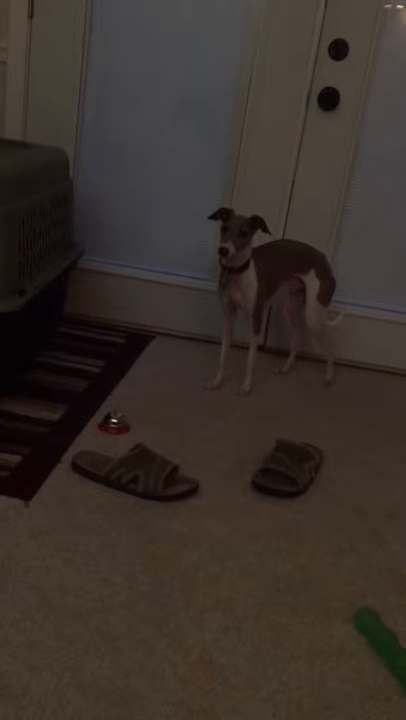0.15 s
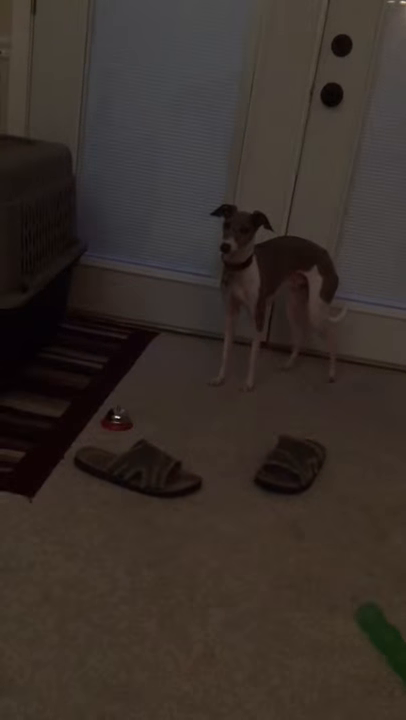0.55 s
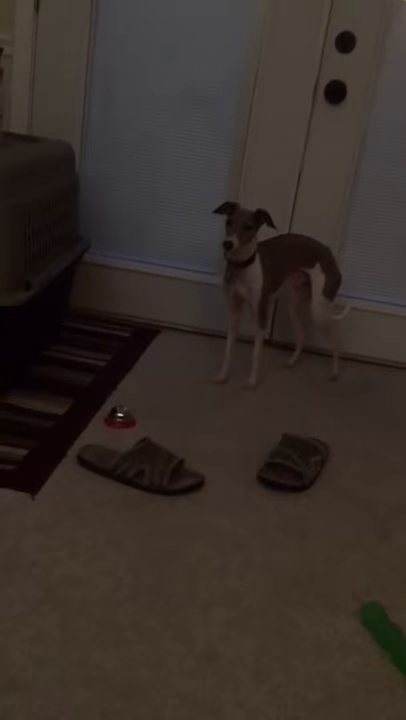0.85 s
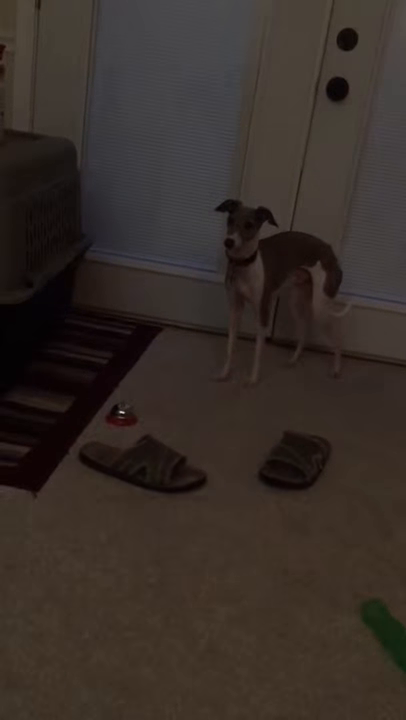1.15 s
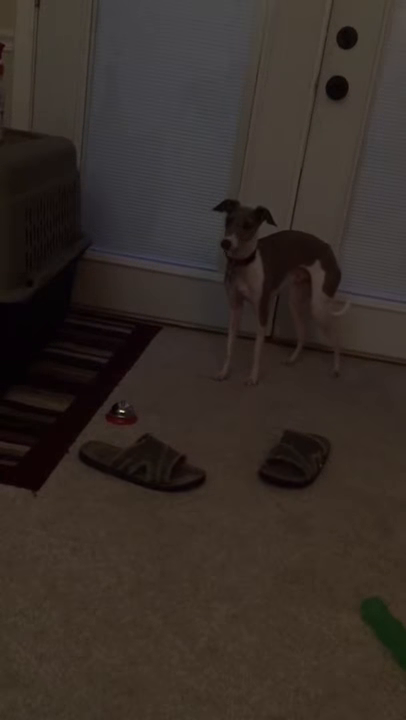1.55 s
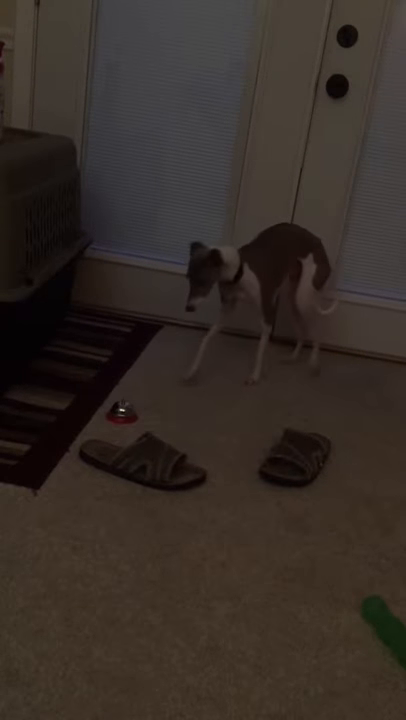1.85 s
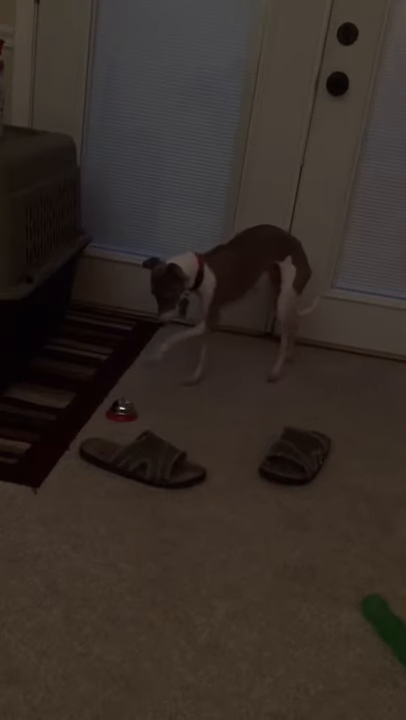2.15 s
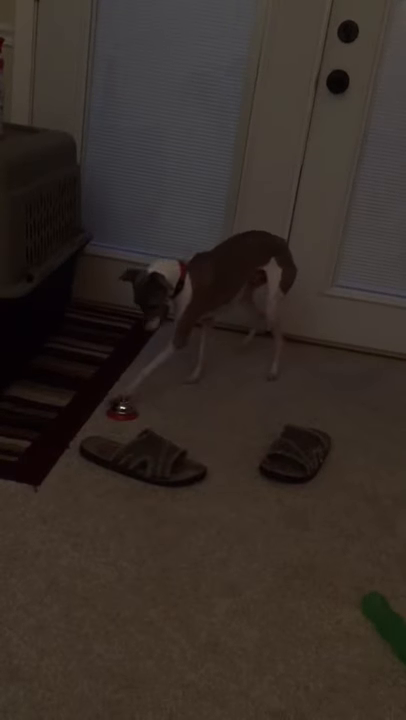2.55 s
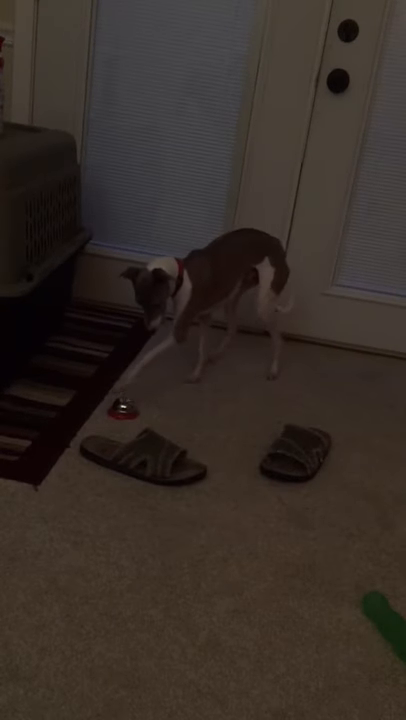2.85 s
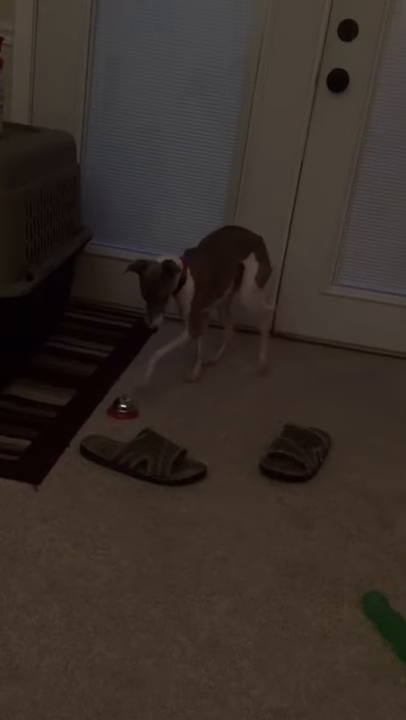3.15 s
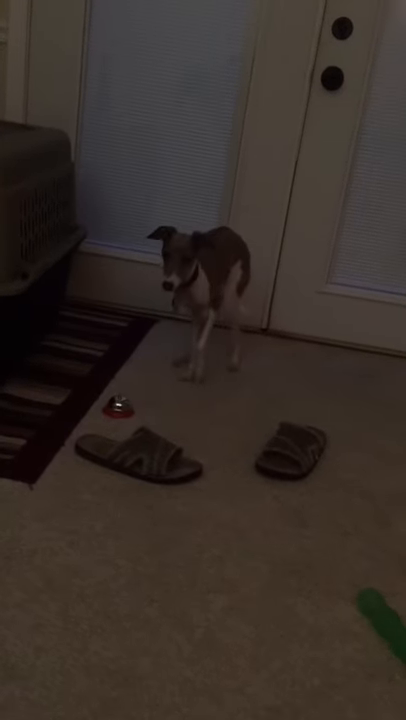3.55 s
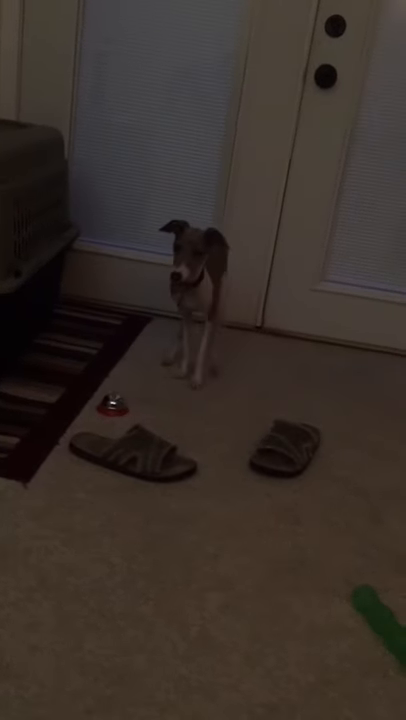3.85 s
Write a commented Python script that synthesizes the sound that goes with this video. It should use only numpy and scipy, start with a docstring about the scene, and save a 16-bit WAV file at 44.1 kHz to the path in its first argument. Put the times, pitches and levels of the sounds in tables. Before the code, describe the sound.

A small metal desk bell is pawed by a dog in a quiet room with low hum, hiss and very faint crickets. Soft handling bumps come at 0.6-0.8 s, a thin collar tag tinkle near 1.8 s. From 2.5 s the plunger rattles, with a sharp click and weak ding at 2.75 s, then a clear, louder high ding at 3.08 s, rattling until 3.3 s. Tiny ticks and bumps end it.

```python
"""A metal desk bell on a carpet, pawed by a small dog: the dome rings twice as decaying sine modes.
The plunger rattles and the collar tag tinkles: modal knocks, noise cracks, random repeat touches.
The paw scuffs (grainy band noise); low bumps are sines of sagging pitch.
Faint crickets outside are gated narrow-band noise; room hiss and hum are shaped noise."""
import sys
import numpy as np
from scipy import signal
from scipy.fft import rfft, irfft
from scipy.io import wavfile
from scipy.ndimage import uniform_filter1d

SR = 44100
rng = np.random.default_rng(int(sys.argv[2]) if len(sys.argv) > 2 else 0)


def makeup_ratio(level_db):
    """Linear amplitude ratio for a level in decibels (20 dB per factor of ten)."""
    decades = np.asarray(level_db, float) / 20
    return 10 ** decades


def unload_wav(signal):
    """Save mono or channel-first audio to the path in sys.argv[1] as 16-bit WAV at rate SR, clipped to [-1, 1]."""
    wavfile.write(
        sys.argv[1],
        SR,
        np.round(np.clip(np.atleast_2d(signal).T, -1, 1) * 32767).astype(np.int16),
    )


N = 176400

# room hiss spectrum: (frequency [Hz], relative density [dB per Hz])
AIR_SPECTRUM = [(12, -38), (20, -12), (42, 1.5), (124, -2.5), (174, -9.5), (252, -3.5), (290, -10.5),
                (485, -16.5), (682, -19), (1140, -19.5), (2450, -23.5), (2910, -24), (3450, -25.5),
                (5150, -25.5), (7890, -31), (16500, -36.5), (18000, -47)]
AIR_RMS_DB = -63.5
# wavering hum lines: (frequency [Hz], width [Hz], level [dB])
HUM_LINES = [(88.7, 4.7, -71), (118.36, 2.1, -72.5), (244, 19, -82.5), (311.3, 8.1, -84), (1179, 11, -88.5)]
# crickets: (pitch [Hz], width [Hz], a chirp start [s], period [s], chirp length [s], level [dB])
CRICKET_CHIRPS = [(6090, 90, .22, .355, .15, -84), (5180, 80, .03, 1.07, .24, -81),
                  (4450, 80, .03, 1.62, .25, -80), (4800, 90, .52, .56, .2, -84),
                  (2880, 150, .05, .3, .2, -84)]
TRILL_HZ, TRILL_DEPTH = 46, 0.13
# low bumps: (time [s], level [dB], start pitch [Hz], end pitch [Hz], length [s])
MIC_BUMPS = [(0.631, -49, 155, 84, 0.016), (0.653, -51, 100, 59.6, 0.02), (0.8057, -41, 472, 87, 0.023),
             (3.73, -51, 152, 84.5, 0.041), (3.846, -52.5, 248, 99, 0.012)]
BUMP_SAG_S = 0.0018
# collar tag mode frequencies [Hz]
TAG_MODE_HZ = [4791, 6400, 7360, 8050, 8200, 8350, 10060, 11060, 11790, 12500, 13430, 13960, 15180, 16870]
# collar tag modes, same order: (relative level [dB], t60 [s])
TAG_MODES = [(-19, 0.039), (-8.5, 0.035), (-12, 0.039), (-0.5, .03), (-12, .03), (-3.5, 0.024),
             (-25, 0.027), (-12.5, 0.037), (-11.5, 0.033), (-23, .02), (-3, .05), (0, 0.027), (-13, .04),
             (-23, 0.031)]
# tag clinks: (time [s], level [dB])
TAG_CLINKS = [(1.754, -70), (1.775, -73.5), (1.856, -50), (1.862, -53), (1.870, -58)]
TAG_CRACK_REL_DB, TAG_CRACK_HZ, TAG_CRACK_OCTAVES = -3.5, 11100, 1
# ticks of claw or collar: (time [s], level [dB], pitch [Hz], t60 [s])
SMALL_TICKS = [(3.927, -43, 4200, .008), (3.932, -44, 13500, .002), (3.879, -54, 14000, .0015)]
# plunger and base mode frequencies [Hz]
PLUNGER_MODE_HZ = [800, 1122, 1560, 1960, 2790, 3600, 3800, 4040, 4820, 5120, 5640, 5900, 6370, 6830, 7050,
                   8350, 9310, 9440, 10770, 12700, 12840, 13280, 13850, 14790, 15490, 16100]
# plunger and base modes, same order: (relative level [dB], t60 [s])
PLUNGER_MODES = [(-14, 0.068), (-4.5, 0.04), (-2, 0.021), (-9, 0.025), (-14, 0.027), (-16.5, 0.042),
                 (-17.5, 0.029), (-11, 0.038), (-10.5, 0.023), (-10.5, 0.03), (-9, 0.013), (-23, 0.027),
                 (-17, 0.025), (-15, 0.019), (-11, 0.015), (-12.5, 0.019), (-6, 0.017), (-10.5, 0.041),
                 (-24, 0.022), (-9, 0.017), (-12, 0.037), (-8, 0.044), (-15, 0.04), (2, 0.017), (-7, .016),
                 (-7, .02)]
# plunger rattles: (time [s], level [dB], blow centre [Hz], blow width [octaves], claw crack level [dB])
PLUNGER_RATTLES = [(2.5, -51, 14100, 2, -44), (2.512, -46, 8250, 2.6, -43.5), (2.529, -47, 2700, 2.6, -64),
                   (2.545, -45, 12100, 1.77, -47), (2.599, -52.5, 9700, 1.7, -72),
                   (2.655, -55, 9100, 0.51, -78), (2.7435, -34.5, 7870, 0.16, -35.5),
                   (2.7503, -36.5, 13100, 2.05, -24.5), (2.761, -43, 1280, 3, -48.5),
                   (2.898, -50, 8700, 0.48, -66), (3.011, -59, 14000, 0.52, -71),
                   (3.023, -46.5, 3550, 4, -45.5), (3.0324, -37, 15000, 0.77, -33),
                   (3.039, -44.5, 4040, 0.44, -50), (3.074, -74, 6870, 0.52, -44),
                   (3.088, -44, 5000, 2.25, -57), (3.117, -50, 1200, 0.57, -56),
                   (3.190, -45, 5100, 1.5, -41.5), (3.237, -40.5, 9300, 0.57, -45),
                   (3.251, -38.5, 8950, 0.41, -51), (3.294, -52.5, 11700, 0.75, -59),
                   (3.304, -49, 4000, 0.32, -60)]
# loose parts: soft start, repeat touches, crack peak time, mode unevenness and level scatter
RISE_CYCLES, CHATTER_S, CHATTER_DB, CHATTER_FADE_DB = 5.6, 0.04, -4, -9
CRACK_PEAK_S, LOOSENESS, SCATTER_DB = 0.00067, 1.2, 1.5
# paw scuffs on metal and carpet: (time [s], length [s], level before fades [dB])
PAW_SCUFFS = [(2.507, 0.053, -63.5), (2.745, 0.059, -57.5), (3.525, 0.033, -65.5)]
# scuff band edges [Hz]
SCUFF_BAND_HZ = [1100, 5000]
# dome mode frequencies [Hz]
DOME_MODE_HZ = [1635, 1679, 4312, 4323.6, 7865, 7855.7, 12186, 12176, 17197, 3811, 9951]
# dome modes, same order: (relative level [dB], rise [s], free t60 [s], t60 under the paw [s],
# kind [0 main, 1 woken by the clapper, 2 close twin of a main mode])
DOME_MODES = [(-37.5, 0.0013, 0.57, 1.6, 0), (-25.5, 0.00081, 0.34, 1.39, 0),
              (-10.5, 0.0013, 0.71, 0.64, 0), (-20, 0.0027, 1.4, 1, 2), (-0.5, 0.009, 2.8, 0.37, 0),
              (-25.5, 0.0012, 0.59, 1, 2), (-1, 0.0016, 0.26, 0.011, 0), (-16.5, 0.0013, 0.69, 0.31, 2),
              (-15, .006, 0.34, 0.2, 0), (-19, 0.022, 0.68, 0.14, 1), (-11, 0.0033, 0.23, 0.031, 1)]
# dome strikes: (time [s], level [dB], tilt above the hum pair [dB per octave], hum pair level [dB],
# extra hum pair swell [s], clapper mode level [dB], twin mode level [dB],
# delay to the paw's touch [s], delay to the plunger brushing the rim [s])
DOME_STRIKES = [(2.746, -45.5, 13, 22.5, 0.053, -25, 12.5, 0.03, 0.094),
                (3.0753, -30, 4, 6.5, 0.00029, 1, -3.5, 0.04, 0.24)]
BRUSH_DB, BRUSH_S = -4, 0.0043
# room decay: (frequency [Hz], t60 [s])
ROOM_DECAY = [(500, 0.083), (2000, 0.29), (6000, 0.23), (12000, 0.27), (17000, 0.041)]
ROOM_SEND_DB, DOME_ROOM_SEND_DB, ROOM_GAP_S = -5, -15, 0.007
MIC_LOW_HZ, MIC_TOP_HZ = 40, 17350


def read(points, hz):
    """Interpolates a table on a log-frequency axis."""
    f, value = np.transpose(points)
    return np.interp(np.log(hz + 1), np.log(f + 1), value)


def evened(x):
    """Scales to rms 1."""
    return x / np.sqrt(np.mean(x ** 2) + 1e-20)


def add(mix, time_s, sound):
    """Mixes a sound in at a time, cut at the end of the mix."""
    part = mix[round(time_s * SR):][:len(sound)]
    part += sound[:len(part)]


def fuzzy_tone(hz, width_hz):
    """Noise squeezed into one narrow line, so its level wavers."""
    f = np.fft.rfftfreq(N, 1 / SR)
    line = 1 / (1 + (2 * (f - hz) / width_hz) ** 2)
    return evened(irfft(rfft(rng.standard_normal(N)) * line, N))


def ring(modes, colour_db, length_s=0.4, uneven=1):
    """Sum of decaying sines with a soft start, weighted by the colour of the blow."""
    hz, db, t60 = np.array(modes).T[:, :, None]
    t = np.arange(round(length_s * SR)) / SR
    rise = 1 - np.exp(-t * hz / RISE_CYCLES)
    fade = makeup_ratio(db + colour_db(hz) - 60 * t / t60)
    return (uneven * rise * fade * np.sin(2 * np.pi * hz * t)).sum(0)


def colour(hz, mid_hz, octaves):
    """Spectrum of a blow in dB: a hump, 6 dB down at the given octaves from its centre."""
    return -6 * (np.log2(hz / mid_hz) / octaves) ** 2


def crack(noise, db, mid_hz, octaves):
    """Very short puff of noise around one colour."""
    t, hz = np.arange(512) / SR, np.fft.rfftfreq(512, 1 / SR) + 1
    puff = evened(irfft(rfft(noise) * makeup_ratio(colour(hz, mid_hz, octaves)), 512))
    return makeup_ratio(db) * puff * 2 * t / CRACK_PEAK_S * np.exp(-t / CRACK_PEAK_S)


def chatter(sound, draws):
    """A loose part touches again at random delays, later touches tending softer."""
    taps, late = np.zeros(4096), draws[:12] ** 2
    at = (late * CHATTER_S * SR).astype(int) % 4096
    taps[at] = makeup_ratio(CHATTER_DB + CHATTER_FADE_DB * late) * (2 * draws[12:] - 1)
    taps[0] = 1
    return signal.fftconvolve(sound, taps)


def loosely(shake):
    """Quick random swells for each mode of a loose part."""
    return 1 + LOOSENESS * uniform_filter1d(np.repeat(shake, 196, axis=1), size=196, axis=1)


def air():
    """Steady hiss and rumble with soft time-frequency patches, plus wavering hum lines."""
    frames, hz = N // 512 + 6, np.fft.rfftfreq(2048, 1 / SR)
    real, imag, patches = rng.standard_normal((frames, 1025, 3)).T
    patches = uniform_filter1d(patches, size=6, axis=0)
    patches = evened(uniform_filter1d(patches, size=6, axis=1))
    patchy_db = np.interp(np.log(hz + 1), np.log([150, 800]), [2.5, 0.5])[:, None]
    z = (real + 1j * imag) * makeup_ratio(read(AIR_SPECTRUM, hz)[:, None] + patchy_db * patches)
    hiss = evened(signal.istft(z, nperseg=2048, noverlap=1536)[1][:N])
    hum = sum(makeup_ratio(db) * fuzzy_tone(f, width) for f, width, db in HUM_LINES)
    return makeup_ratio(AIR_RMS_DB) * hiss + hum


def crickets():
    """Each insect repeats a trilled chirp at its own pitch and pace."""
    t, out = np.arange(N) / SR, np.zeros(N)
    for hz, width, start, period, length, db in CRICKET_CHIRPS:
        # the cycle also runs before the listed start
        gate = uniform_filter1d(1.0 * ((t - start) % period < length), size=3000)
        trill = 1 + TRILL_DEPTH * np.sin(2 * np.pi * (TRILL_HZ * t + rng.random()))
        out += makeup_ratio(db) * gate * trill * fuzzy_tone(hz, width)
    return out


def bumps():
    """Short low thumps of sagging pitch, carried through the hand-held microphone."""
    out = np.zeros(N)
    for time, db, high_hz, low_hz, length in MIC_BUMPS:
        t = np.arange(round(length * SR)) / SR
        hz = low_hz + (high_hz - low_hz) * np.exp(-t / BUMP_SAG_S)
        swell = np.sin(np.pi * (t / length) ** 0.57)
        add(out, time, makeup_ratio(db) * swell * np.sin(2 * np.pi * np.cumsum(hz) / SR))
    return out


def collar():
    """The tag's modes clink with a noise crack and repeat touches; single ticks follow later."""
    out = np.zeros(N)
    scatter = rng.standard_normal((len(TAG_CLINKS), len(TAG_MODES), 1))
    touches = rng.random((len(TAG_CLINKS), 24))
    cracks = rng.standard_normal((len(TAG_CLINKS), 512))
    shakes = rng.standard_normal((len(TAG_CLINKS), len(TAG_MODES), 90))
    modes = np.c_[TAG_MODE_HZ, TAG_MODES]
    for (time, db), odd, touch, noise, shake in zip(TAG_CLINKS, scatter, touches, cracks, shakes):
        clink = ring(modes, lambda hz: db + SCATTER_DB * odd, uneven=loosely(shake))
        add(clink, 0, crack(noise, db + TAG_CRACK_REL_DB, TAG_CRACK_HZ, TAG_CRACK_OCTAVES))
        add(out, time, chatter(clink, touch))
    for time, db, hz, t60 in SMALL_TICKS:
        add(out, time, ring([(hz, db, t60)], lambda hz: 0))
    return out


def plunger():
    """Each knock wakes the modes near its own colour, with a short crack of the claw."""
    out = np.zeros(N)
    scatter = rng.standard_normal((len(PLUNGER_RATTLES), len(PLUNGER_MODES), 1))
    cracks = rng.standard_normal((len(PLUNGER_RATTLES), 512))
    touches = rng.random((len(PLUNGER_RATTLES), 24))
    shakes = rng.standard_normal((len(PLUNGER_RATTLES), len(PLUNGER_MODES), 90))
    modes = np.c_[PLUNGER_MODE_HZ, PLUNGER_MODES]
    for rattle, odd, noise, touch, shake in zip(PLUNGER_RATTLES, scatter, cracks, touches, shakes):
        time, db, mid_hz, octaves, crack_db = rattle
        knock = ring(modes, lambda hz: db + colour(hz, mid_hz, octaves) + SCATTER_DB * odd,
                     uneven=loosely(shake))
        add(out, time, crack(noise, crack_db, mid_hz, octaves / 2))
        add(out, time, chatter(knock, touch))
    return out


def paw():
    """Soft scuffs: band noise made grainy by a spiky random envelope."""
    out = np.zeros(N)
    for time, length, db in PAW_SCUFFS:
        n = round(length * SR)
        grains = uniform_filter1d(rng.exponential(1, 8192) ** 2, size=40)
        grit = rng.standard_normal(8192) * grains
        grit = signal.lfilter(*signal.butter(1, SCUFF_BAND_HZ, "band", fs=SR), grit)
        add(out, time, makeup_ratio(db) * evened(grit)[:n] * np.hanning(n) ** 0.5)
    return out


def dome():
    """A strike rings the modes freely until the paw's touch changes their decay, mostly faster."""
    out, t = np.zeros(N), np.arange(SR) / SR
    hz = np.array(DOME_MODE_HZ)[:, None]
    mode_db, rise, free, held, kind = np.array(DOME_MODES).T[:, :, None]
    kind = np.round(kind)
    hum = hz < 2000  # the low hum pair
    for time, db, tilt_db, hum_db, swell, clapper_db, twin_db, touch, brush in DOME_STRIKES:
        colour_db = np.where(hum, hum_db, tilt_db * np.log2(hz / 8000))
        colour_db = colour_db + clapper_db * (kind == 1) + twin_db * (kind == 2)
        fade_db = -60 * (np.minimum(t, touch) / free + np.maximum(t - touch, 0) / held)
        # the loose plunger brushing the rim lowers all but the hum pair
        fade_db = fade_db + BRUSH_DB * ~hum * np.clip((t - brush) / BRUSH_S, 0, 1)
        start = 1 - np.exp(-(t / (rise + swell * hum)) ** (1 + hum))
        level = makeup_ratio(db + mode_db + colour_db + fade_db)
        add(out, time, (start * level * np.sin(2 * np.pi * hz * t)).sum(0))
    return out


def room(x):
    """Sparse random reflections, each band dying at its own speed."""
    taps = np.zeros(SR // 2)
    at = np.arange(round(ROOM_GAP_S * SR), SR // 2 - 20, 20)
    at = at + rng.integers(0, 20, len(at))
    taps[at] = rng.choice([-1.0, 1.0], len(at))
    hz, t, z = signal.stft(taps, SR, nperseg=128)
    decay = makeup_ratio(-60 * t / read(ROOM_DECAY, hz)[:, None])
    tail = signal.istft(z * decay, SR, nperseg=128)[1]
    return signal.fftconvolve(x, tail / np.linalg.norm(tail))[:N]


def scene():
    """Sums all sources; only dome, plunger, collar and paw feed the room echo."""
    bell, small = dome(), plunger() + collar() + paw()
    echo = room(makeup_ratio(ROOM_SEND_DB) * small + makeup_ratio(DOME_ROOM_SEND_DB) * bell)
    return (bell + small + echo + bumps() + crickets() + air())[None]


def top_cut(x):
    """Nothing passes above the cut-off."""
    return signal.sosfilt(signal.butter(12, 18680, fs=SR, output="sos"), x)


def record(dry):
    """Limits the band at both ends, as the microphone does."""
    high_pass = signal.butter(4, MIC_LOW_HZ, "high", fs=SR, output="sos")
    low_pass = signal.ellip(8, 0.5, 50, MIC_TOP_HZ, fs=SR, output="sos")
    band = signal.sosfilt(low_pass, signal.sosfilt(high_pass, dry))
    return top_cut(band)


dry = scene()
out = record(dry)
unload_wav(out)
```